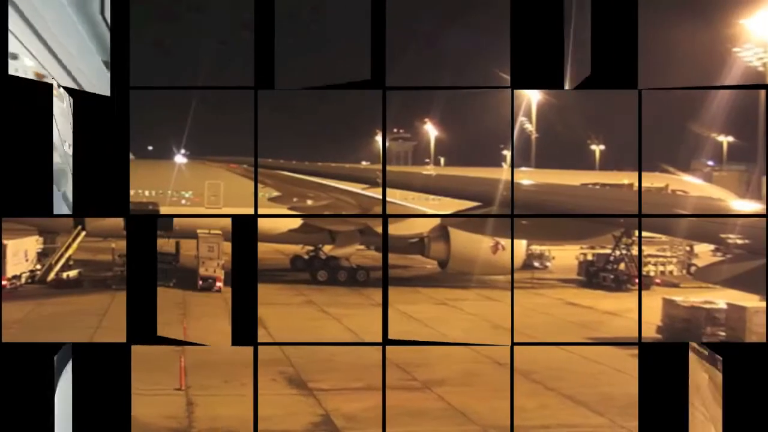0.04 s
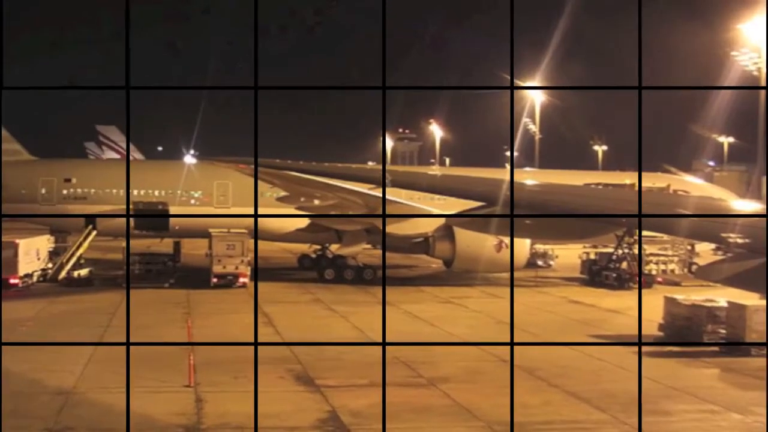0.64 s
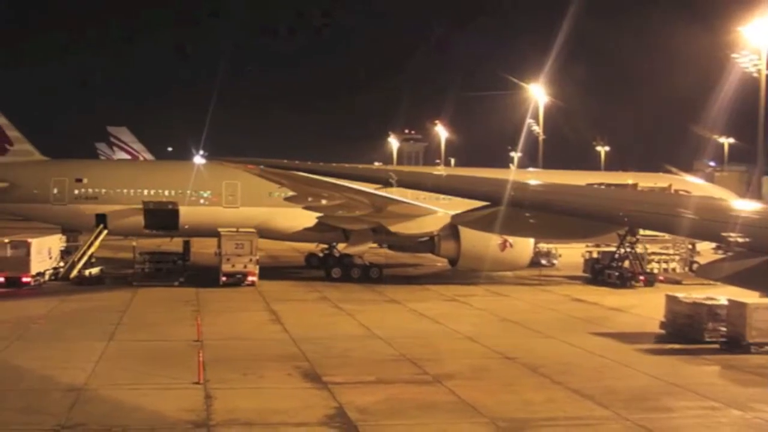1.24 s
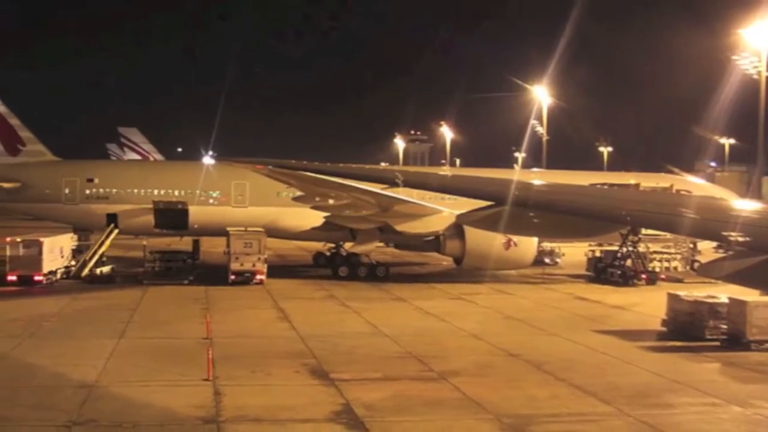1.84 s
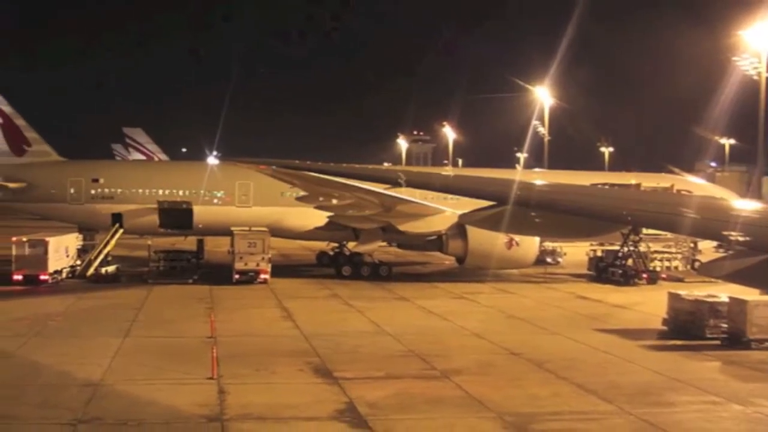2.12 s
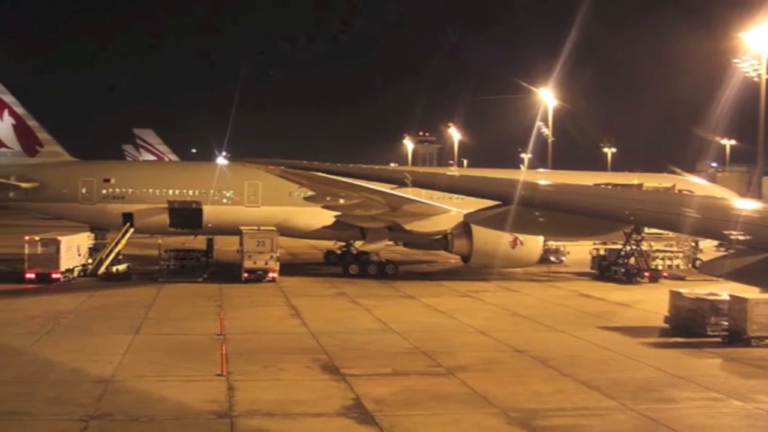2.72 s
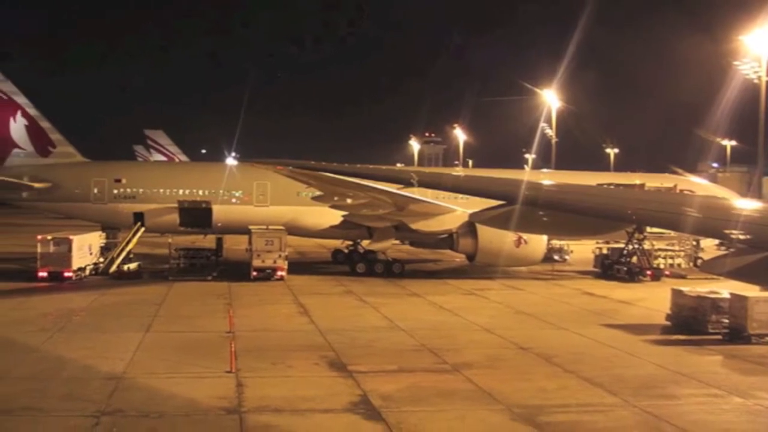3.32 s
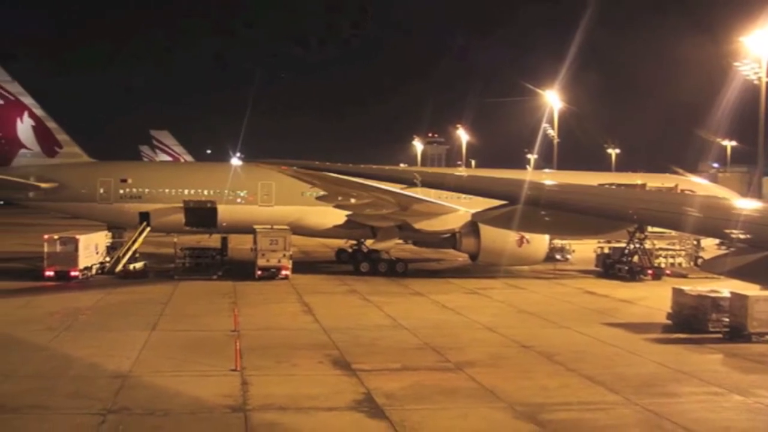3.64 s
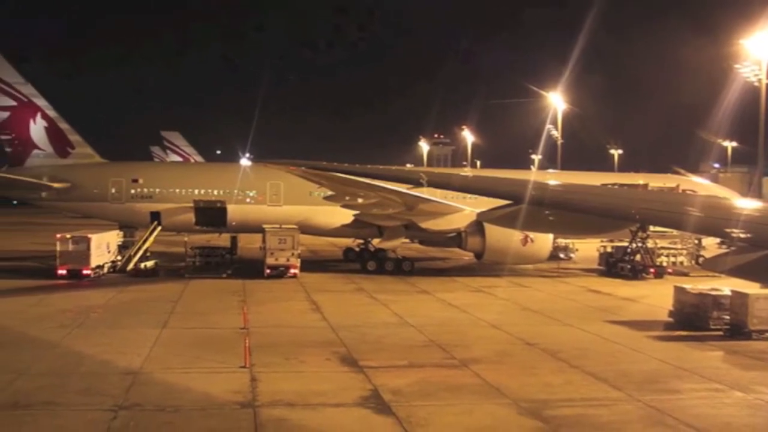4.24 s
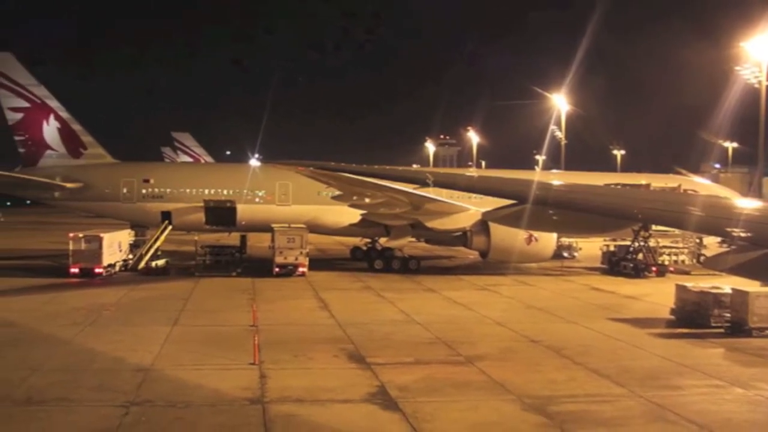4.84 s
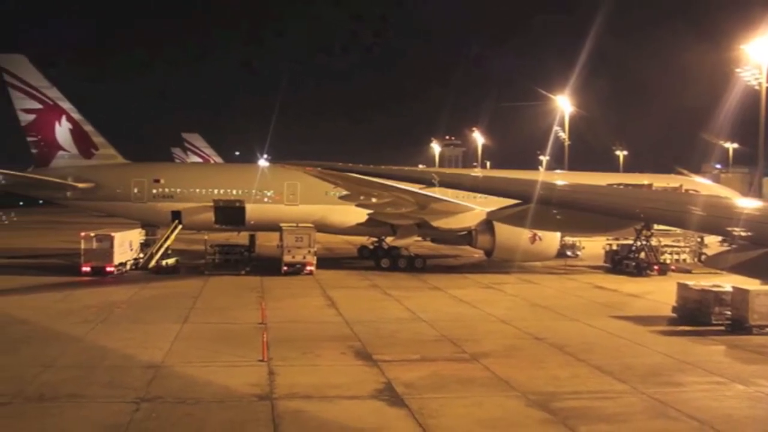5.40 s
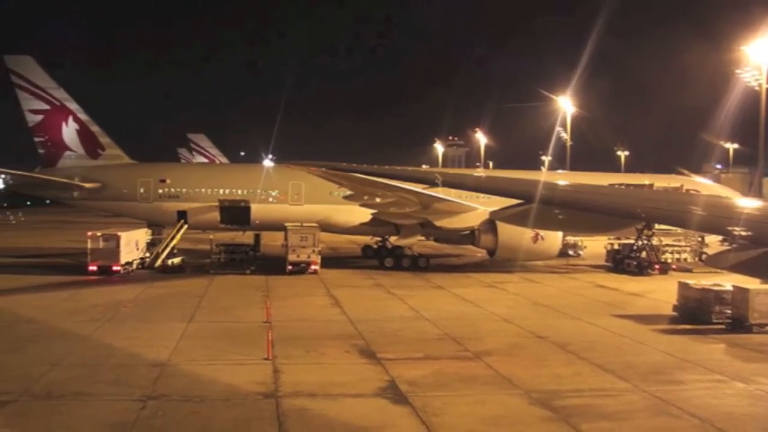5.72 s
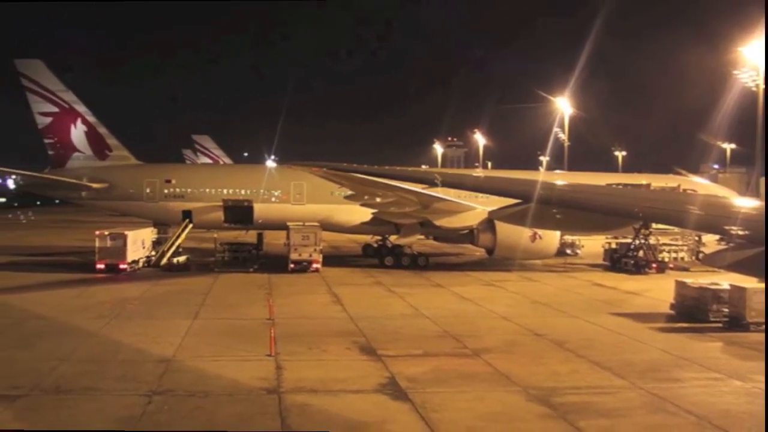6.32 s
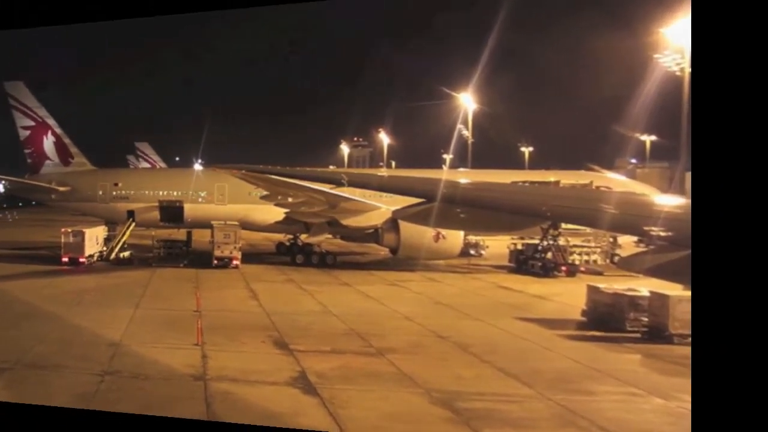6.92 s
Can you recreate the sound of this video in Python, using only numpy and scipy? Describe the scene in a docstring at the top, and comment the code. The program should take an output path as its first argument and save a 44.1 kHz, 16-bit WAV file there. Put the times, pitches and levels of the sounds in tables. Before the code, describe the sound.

A jet airliner roars and crackles as it climbs away, fading into a deep rumble over faint airport machinery.

```python
"""An open airport apron at night: a jet airliner climbs away.
Its exhaust roars with turbulent mixing and crackles with tiny shocks. With distance the air swallows
the treble, the deep rumble of the plume takes over, and the bounce off the concrete sweeps a slow comb
upward. Underneath, far machinery drones and a parked turbine whines faintly; near the end something
like a latch clicks a few times."""
import sys
import numpy as np
from scipy import signal
from scipy.fft import rfft, irfft
from scipy.io import wavfile
from scipy.ndimage import uniform_filter1d

SR = 44100
rng = np.random.default_rng(int(sys.argv[2]) if len(sys.argv) > 2 else 0)


def store_pcm(level_fs):
    """Save levels as 16-bit WAV."""
    pcm = np.round(np.clip(level_fs, -1, 1) * 32767).astype(np.int16)
    wavfile.write(sys.argv[1], SR, np.atleast_2d(pcm).T)


N = 315756
TIME = np.arange(N) / SR


def undb(db):
    """Decibels to gain."""
    return 10 ** (np.asarray(db) / 20)


def curve(points, time):
    """Read an envelope of (seconds, value) points along straight lines."""
    return np.interp(time, *np.transpose(points))


def spectrum_db(points, hz):
    """Read an EQ curve of (Hz, dB) points on a log-frequency axis."""
    point_hz, db = np.transpose(points)
    return np.interp(np.log(np.maximum(hz, 1)), np.log(point_hz), db)


def bell(hz, centre_hz, octaves):
    """An EQ bell of height 1 on a log-frequency axis."""
    return np.exp(-(np.log2(hz / centre_hz) / octaves) ** 2)


def unit(x):
    """Scale to rms 1."""
    return x / np.std(x)


def filtered(x, gain):
    """Filter by a gain that is a function of frequency."""
    return irfft(rfft(x) * gain(np.fft.rfftfreq(N, 1 / SR)), N)


def noise(points):
    """Noise of rms 1, coloured by an EQ curve."""
    return unit(filtered(rng.standard_normal(N), lambda hz: undb(spectrum_db(points, hz))))


def resonance(centre_hz, width_hz):
    """Noise of rms 1 in one steep-sided resonance."""
    white = rng.standard_normal(N)
    return unit(filtered(white, lambda hz: 1 / (1 + ((hz - centre_hz) / width_hz * 2) ** 2)))


def walk(rate):
    """A smooth random modulator of spread 1 that moves about rate times a second."""
    hold = max(int(SR / rate), 1)
    steps = np.repeat(rng.standard_normal(N // hold + 1), hold)[:N]
    return unit(uniform_filter1d(steps, hold))


def distance(time, recede_s=2.2):
    """The jet's range on a straight path, in multiples of its nearest range, which is at time 0."""
    return np.hypot(1, time / recede_s)


def apron(wash_db=-44.5):
    """The bed: a steady wash of far machinery and the whine of a parked turbine."""
    # Colour of the wash. Each row: frequency in Hz, relative level in dB.
    wash_eq = [(30, -37), (60, -0.5), (150, -3), (210, -12.5), (400, -7), (1000, -17), (2000, -22.5),
               (2800, -42), (3700, -38), (4250, -55), (8000, -52), (11500, -51), (15000, -63)]
    # The turbine's narrow bands. Each row: centre in Hz, width in Hz, level in dB.
    whine_bands = [(2270, 100, -66), (3400, 150, -76), (3730, 60, -80)]
    whine = sum(undb(db) * resonance(hz, width) for hz, width, db in whine_bands)
    return undb(wash_db) * noise(wash_eq) + whine


def latch_clicks(rise_s=0.0017, t60_s=0.17):
    """Each click is a short rattle in a latch's resonances; the higher ones die sooner."""
    # The clicks. Each row: start in seconds, level in dB.
    hits = [(6.297, -62), (6.752, -51.5), (6.78, -61), (7.012, -55.5)]
    # The latch's resonances. Each row: centre in Hz, width in Hz, relative level in dB.
    modes = [(2290, 180, 0.5), (2710, 300, -8), (3220, 220, -11.5), (3710, 120, -10), (5400, 1300, -16.5),
             (7000, 1500, -20)]
    out = 0
    for hz, width, mode_db in modes:
        ring = resonance(hz, width)
        decay_s = t60_s * np.sqrt(modes[0][0] / hz)
        for start, db in hits:
            age = np.maximum(TIME - start, 0)
            envelope = (1 - np.exp(-age / rise_s)) * np.exp(-np.log(1000) * age / decay_s)
            out = out + undb(db + mode_db) * ring * envelope
    return out


def plume_rumble():
    """Eddies in the plume make a deep rumble that builds as the jet leaves."""
    # Colour of the eddies. Each row: frequency in Hz, relative level in dB.
    eddy_eq = [(20, -30), (32, -22), (45, 5), (60, 9.5), (90, 12), (115, 9), (150, -1.5), (220, -7),
               (500, -76)]
    # The rumble's fader. Each row: time in seconds, level in dB.
    fader = [(0.0, -46.5), (1.5, -42.5), (2.4, -39), (2.9, -38), (3.5, -36), (4.4, -37.7), (5.3, -38),
             (5.9, -37), (6.3, -36.5), (6.75, -40)]
    return undb(curve(fader, TIME)) * noise(eddy_eq)


def exhaust(shocks_per_s=4200, scatter_db=4.5, crossover_hz=1700, burst_db=0.7, duck_db=0.1):
    """Mixing noise below, steep little shocks crackling in bursts above; together flat in spectrum."""
    arrives = rng.random(N) < shocks_per_s / SR
    bursts = unit(walk(240) + walk(60))
    shocks = unit(arrives * undb(scatter_db * rng.standard_normal(N) + burst_db * bursts))
    crackle = filtered(shocks, lambda hz: hz ** 2 / np.hypot(hz ** 2, crossover_hz ** 2))
    white = rng.standard_normal(N)
    mixing = filtered(white, lambda hz: crossover_hz ** 2 / np.hypot(hz ** 2, crossover_hz ** 2))
    return crackle + mixing * undb(-duck_db * bursts)


def roar_eq(hz, time, hump_db=2, rasp_db=1.8, rasp_fade_s=0.55, body_hz=480):
    """The roar's moving EQ in dB: it fades and grows heavier as the jet recedes and turns its tail."""
    # The exhaust's colour up close. Each row: frequency in Hz, relative level in dB.
    close_eq = [(150.0, -1.5), (240.0, 1), (400.0, -2), (620.0, -2.0), (850.0, -4.5), (1020.0, -4.5),
                (1180.0, -6.5), (1500.0, -12), (2200.0, -14), (3200.0, -22), (5000.0, -30), (7000.0, -32.5),
                (9800.0, -39.5), (11500.0, -50.5), (13500.0, -69)]
    # The roar's fader. Each row: time in seconds, relative level in dB.
    fader = [(0.0, -33), (0.5, -32.5), (0.85, -32.5), (1.2, -34), (1.6, -35.5), (2.2, -36), (2.65, -37.5),
             (3.2, -38.5), (3.48, -37.5), (3.95, -39.5), (4.5, -41.5), (5.1, -43.5), (5.4, -41),
             (5.75, -43.5), (6.59, -49), (7.15, -53)]
    # A low hump that holds, sags, then climbs. Each row: time in seconds, centre in Hz.
    hump = [(0.0, 236), (1.3, 235), (2.9, 207), (3.7, 238), (5.2, 310), (6.4, 305)]
    # The low body of the roar, beamed backward. Each row: time in seconds, low-shelf gain in dB.
    body = [(0.0, -0.9), (0.85, -0.8), (1.8, 3), (2.7, 3), (3.7, 0.7), (4.8, 4), (5.2, 5.5), (5.7, 1),
            (6.3, 5.5), (6.7, -2.5), (7.15, 5.5)]
    db = spectrum_db(close_eq, hz) + curve(fader, time)
    db += hump_db * bell(hz, curve(hump, time), octaves=0.31)
    side_on = np.exp(-(time / rasp_fade_s) ** 2)
    db += rasp_db * side_on * bell(hz, centre_hz=2900, octaves=0.98)
    return db + curve(body, time) / (1 + (hz / body_hz) ** 4)


def path_loss(hz, time, pivot_hz=1200, treble_hz=7000, air_power=1.8, hollow_db=3.5):
    """Loss in dB: air absorbs the treble, and soft ground at grazing angles scoops the low mids."""
    # Treble sinks in uneven steps as the exhaust points away.
    # Each row: time in seconds, approximate loss at treble_hz in dB.
    treble_loss = [(0.0, 1.0), (0.8, 0), (1.2, -0.4), (2.68, -0.1), (2.82, 2.5), (3.1, 0.5), (3.15, 5),
                   (3.45, 4), (4.1, 9), (4.35, 12), (4.62, 10), (4.7, 18.5), (6.3, 34)]
    tilt = (hz ** air_power - pivot_hz ** air_power) / treble_hz ** air_power
    hollow = hollow_db * (distance(time) - 1) * bell(hz, centre_hz=570, octaves=0.39)
    return curve(treble_loss, time) * tilt + hollow


def turbulence(hz, time, flutter_db=0.54, patchy_db=1.35, gust_db=0.85):
    """Level wobble in dB: turbulent air flutters the roar more with distance; gusts sway the hiss."""
    together = np.interp(time, TIME, walk(rate=18))
    specks = rng.standard_normal((len(hz), len(time)))
    across_bands = uniform_filter1d(specks, size=9, axis=0)
    patches = unit(uniform_filter1d(across_bands, size=6, axis=1))
    depth = (.5 + time / time[-1]) * hz / np.hypot(hz, 500)  # long waves stay steady
    gusts = np.interp(time, TIME, walk(rate=7)) * hz / np.hypot(hz, 7000)
    return (flutter_db * together + patchy_db * patches) * depth + gust_db * gusts


def through_air(x, low_cut_hz=135):
    """Shape the exhaust into a distant roar: weakened, dulled and fluttering on its way here."""
    hz, time, frames = signal.stft(x, SR, nperseg=1024, noverlap=768)
    hz = np.maximum(hz, 1)[:, None]
    db = roar_eq(hz, time) - path_loss(hz, time) + turbulence(hz, time)
    low_cut = hz ** 2 / np.hypot(hz ** 2, low_cut_hz ** 2)
    return signal.istft(frames * undb(db) * low_cut, SR, nperseg=1024, noverlap=768)[1][:N]


def over_concrete(x, dull_hz=1500, near_lag_ms=4.82, far_lag_ms=1.07):
    """The ground adds a duller copy; its lag shrinks as the jet nears the horizon, so the comb rises."""
    # The bounce swells once as the jet turns its tail. In order: start and end of the hold in seconds,
    # held level in dB, rise and fall in dB per second.
    start, end, held_db, rise, fall = (3.9, 5.8, -6.4, 5.0, 8)
    swell_db = held_db - rise * np.maximum(start - TIME, 0) - fall * np.maximum(TIME - end, 0)
    lag_ms = far_lag_ms + (near_lag_ms - far_lag_ms) / distance(TIME)
    dulled = filtered(x, lambda hz: 1 / (1 + (hz / dull_hz) ** 6))
    return x + undb(swell_db) * np.interp(TIME - lag_ms / 1000, TIME, dulled)


def jet(roar_gain_db=19.5):
    """The plume's rumble and the crackling roar, each heard directly and off the concrete."""
    rumble = plume_rumble()
    roar = undb(roar_gain_db) * through_air(exhaust())
    return over_concrete(roar + rumble)


def scene():
    """The jet, the apron bed and the clicks, in mono."""
    return (jet() + apron() + latch_clicks())[None]


def record(dry, ceiling=0.19, top_hz=15100):
    """Soft saturation rounds the highest peaks; a steep low-pass cuts the top."""
    rounded = ceiling * np.tanh(dry / ceiling)
    return signal.sosfilt(signal.ellip(8, .2, 70, top_hz, fs=SR, output="sos"), rounded)


dry = scene()
out = record(dry)
store_pcm(out)
```